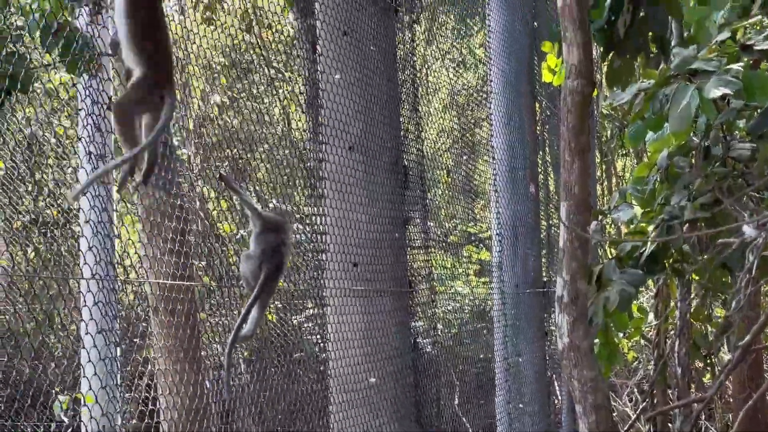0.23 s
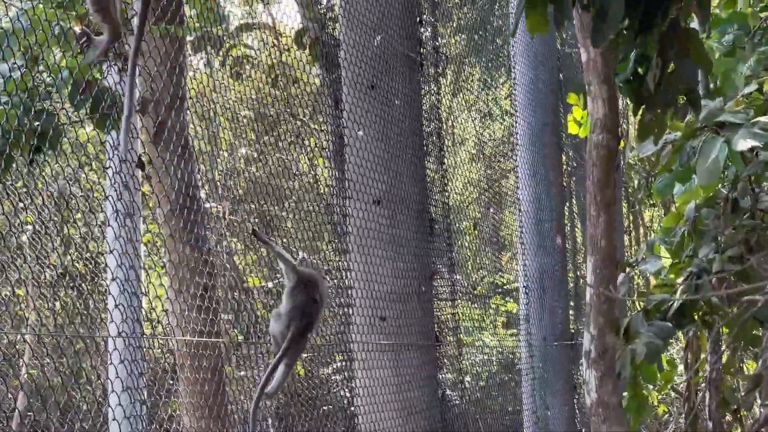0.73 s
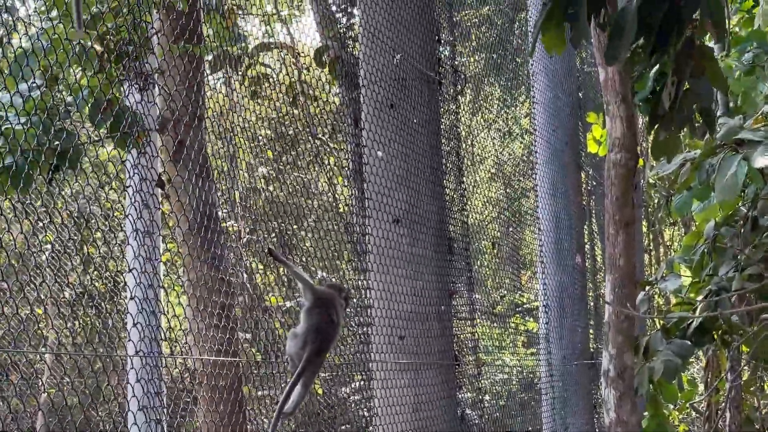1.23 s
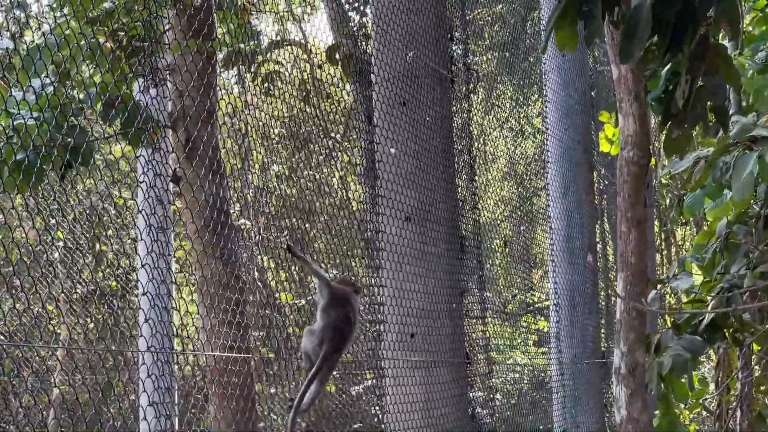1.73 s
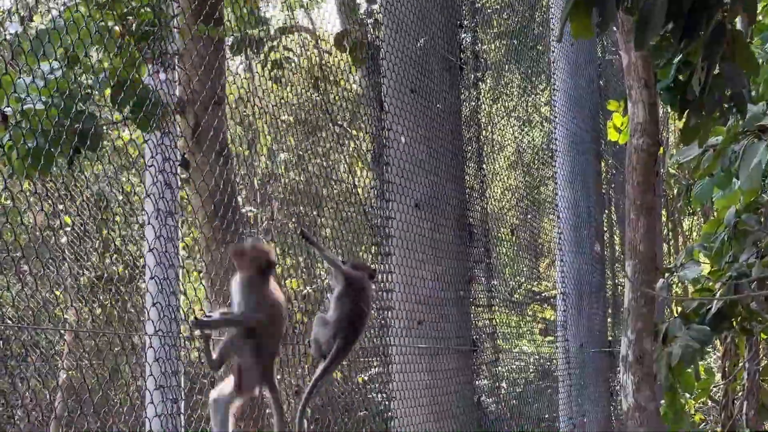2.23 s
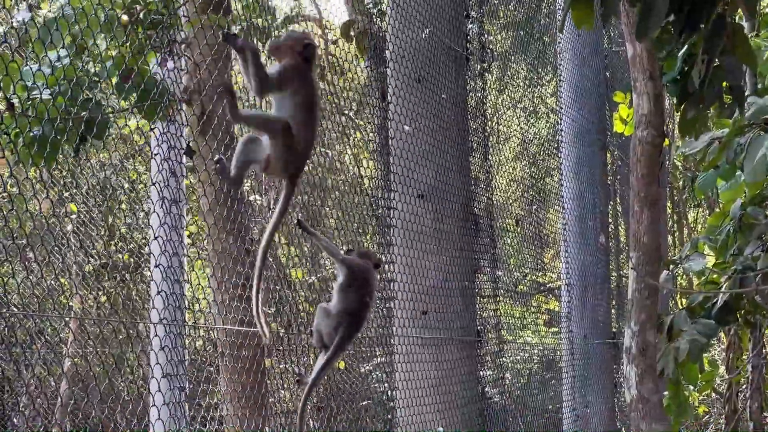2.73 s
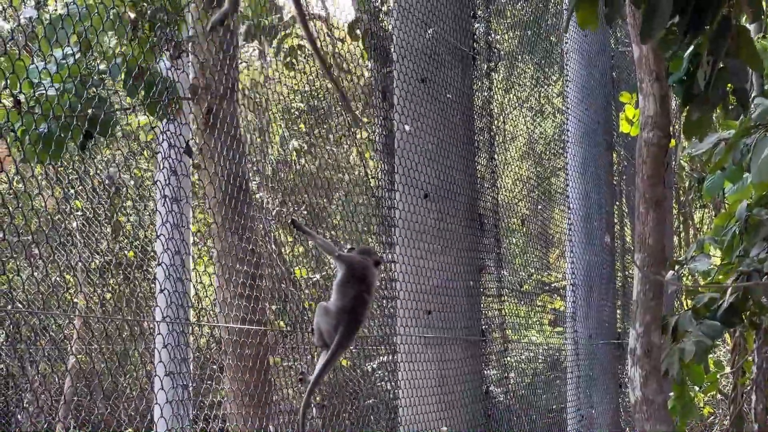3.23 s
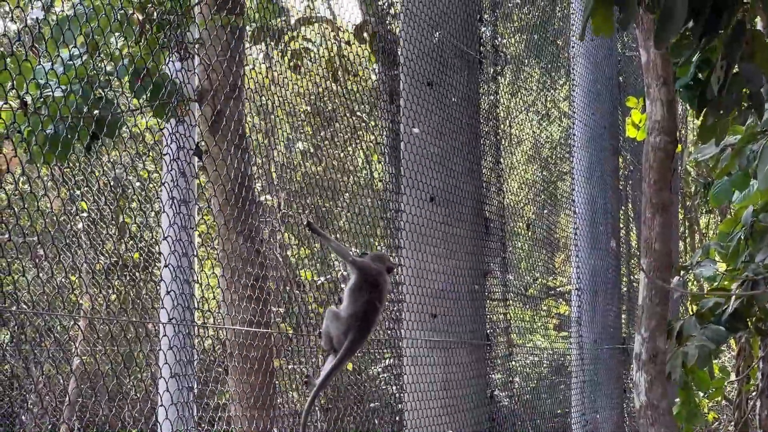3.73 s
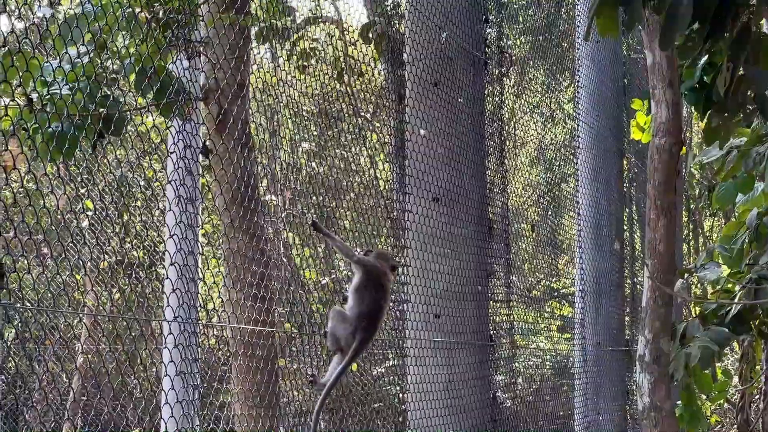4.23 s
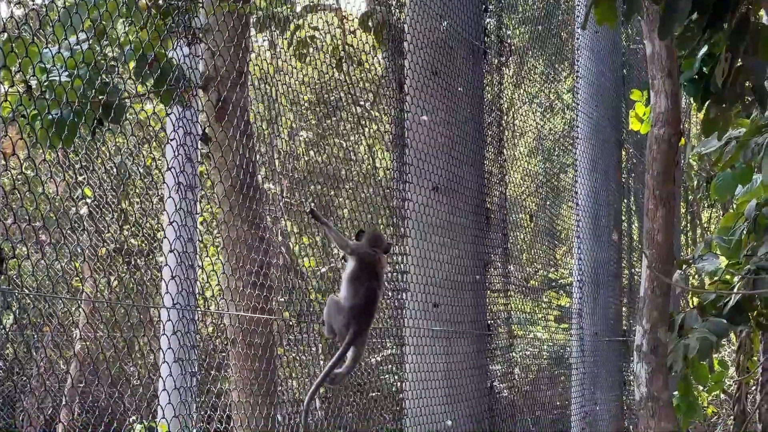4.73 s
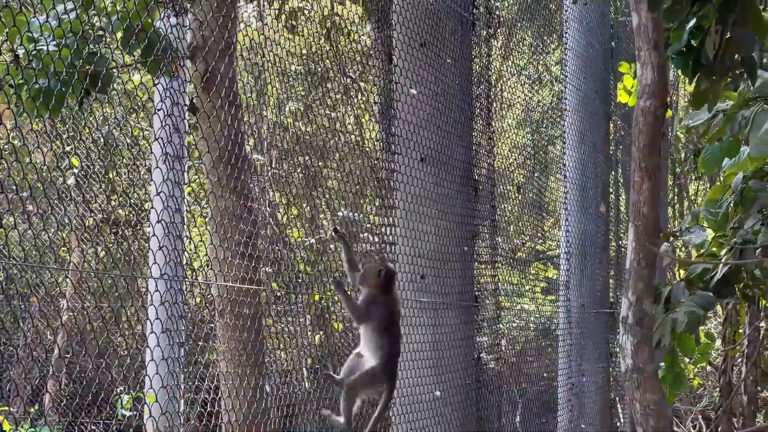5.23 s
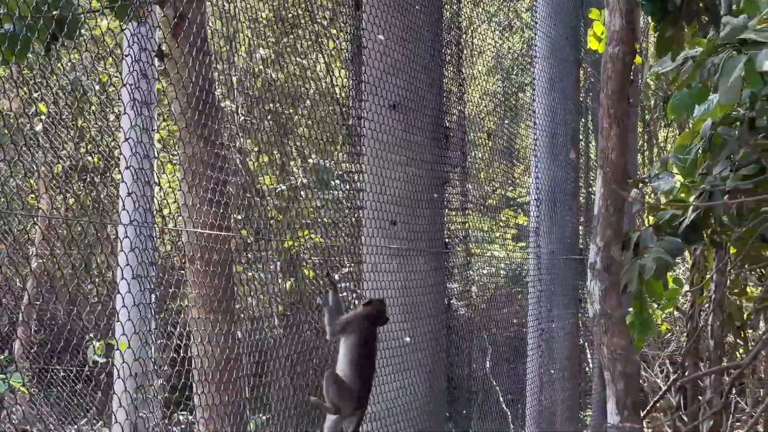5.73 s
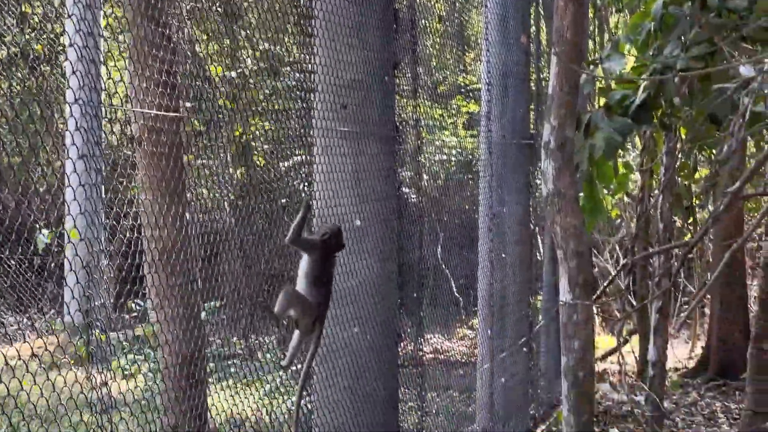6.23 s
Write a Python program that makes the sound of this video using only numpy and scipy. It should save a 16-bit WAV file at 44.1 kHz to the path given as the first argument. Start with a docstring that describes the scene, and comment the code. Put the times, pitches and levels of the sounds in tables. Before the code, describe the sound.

A low rumble with a faint hum of far engines runs under the nearby sounds of monkeys moving in a forest. Twigs crack at the start, followed by uneven rustling strokes, a few weak bird chirps and small pings of fence wire. Later the mesh thuds and rattles under hands and feet, and dry leaves crunch in bursts with more snaps. The trees add a light echo.

```python
"""Twigs snap and a fence wire pings over a low rumble and far engines: monkeys climb in a dry forest.
Soft rubbing and swishing comes and goes, the noise of sliding friction, with a few faint chirps early on.
Near the end hands and feet knock the mesh while dry leaves crunch in several pushes.
Pings, snaps and thuds are damped vibrations; the crunch is a swarm of tiny fractures.
The trunks scatter all these near sounds into echoes."""
import sys
import numpy as np
from scipy import signal
from scipy.fft import rfft, irfft
from scipy.io import wavfile
from scipy.ndimage import uniform_filter1d

SR = 44100
rng = np.random.default_rng(int(sys.argv[2]) if len(sys.argv) > 2 else 0)


def output_pcm(signal):
    """Save a mono or channel-first signal as 16-bit PCM at the path in sys.argv[1].

    Samples are clipped to [-1, 1] before scaling.
    """
    pcm = np.clip(np.atleast_2d(signal).T, -1, 1) * 32767
    wavfile.write(sys.argv[1], SR, np.round(pcm).astype(np.int16))


N = 285327
TIME, FREQS = np.arange(N) / SR, np.fft.rfftfreq(N, 1 / SR)

# Spectra of the noises. Each row: frequency in Hz, relative spectral density in dB.
RUMBLE_COLOUR = [(22, -53), (36, -6.5), (50, 3.5), (80, 3.5), (105, 2.5), (150, -0.5), (175, -6),
                 (205, -19.5), (250, -16.5), (340, -23), (480, -33), (900, -41)]
AIR_COLOUR = [(200, -4), (600, 4), (1100, 1), (2500, -1), (5000, 0.5), (9000, -0.5), (11800, -2.5)]
RUB_COLOUR = [(250, -21.5), (600, -8), (1000, -7), (1600, -1), (2500, 1.5), (3400, 2), (4300, 1.5),
              (6200, 1), (9000, -2), (11800, -5)]
FIZZ_COLOUR = [(4000, -32), (8000, -4), (11500, 3.5)]
RATTLE_COLOUR = [(200, -38), (500, -5), (1400, -5.5), (4000, -18)]
CRISP_COLOUR = [(500, -63), (1300, -12.5), (2400, -10), (4000, -11), (6000, -9.5), (8500, -7.5),
                (11900, -9)]
BODY_COLOUR = [(150, 3), (280, -2.5), (370, -3), (500, -5.5), (800, -8), (1300, -7), (2200, -27),
               (4000, -23)]
# Envelopes of three far engines and of the fizz in the rubbing. Each row: time in seconds, level in dB.
DRONE_LEVEL = [(0, -45), (1.7, -50), (2.08, -37.5), (2.45, -51), (3.1, -44), (3.9, -43), (4.7, -47.5),
               (6.47, -46.5)]
HUM_LEVEL = [(1.9, -57), (2.5, -52), (3.4, -51), (4.15, -45), (4.45, -68), (6.47, -53)]
REV_LEVEL = [(0, -68), (.95, -46), (1.35, -59), (1.75, -47.5), (2.2, -85)]
FIZZ_LEVEL = [(.1, -50), (.42, -94), (.7, -57.5), (1.05, -58), (1.2, -47.5), (1.85, -44.5), (2.1, -64.5)]
# A faint far whine. Each row: time in seconds, pitch in Hz, level in dB.
WHINE = [(1.7, 218, -67), (2.3, 221, -58.5), (3, 209.6, -69.5), (6.47, 213.3, -61.5)]
# A bird's whistle. One row: start and length in seconds, first and limiting pitch in Hz, level in dB.
WHISTLE = (.629, .031, 7600, 9650, -52)
# Raspy chirps and soft swishes. Each row: start and length in seconds, centre pitch in Hz,
# glide as a share of that pitch, starting bandwidth in Hz, relative level in dB.
CHIRPS = [(.238, 0.095, 3160, -0.024, 750, -46.5), (.888, 0.093, 3145, -0.068, 620, -48),
          (1.405, 0.067, 2850, 0.24, 1100, -44), (1.535, .19, 2654, -0.36, 1300, -45),
          (1.812, 0.13, 4460, 0.16, 1300, -45.5), (1.83, 0.077, 2924, 0.078, 604, -39.5),
          (1.944, 0.056, 3050, -0.21, 450, -46)]
SWISHES = [(1.046, 0.15, 2206, -.3, 704, -56.5), (1.4, 0.5, 5950, .06, 400, -55),
           (1.473, 0.24, 1404, -0.087, 437, -51), (1.67, 0.31, 1856, 0.2, 625, -47.5),
           (2.09, 0.13, 5830, -0.095, 1000, -47.5), (2.129, 0.34, 3020, -0.11, 920, -50.5),
           (2.3, 0.477, 1978, -0.0028, 800, -53.5), (2.47, 0.11, 5950, 0.083, 1300, -46.5),
           (2.74, 0.24, 5320, 0.021, 1200, -48.5), (2.87, 0.33, 4350, 0.072, 604, -50.5),
           (2.94, 0.13, 5930, 0.064, 1200, -45.5), (3.38, 0.26, 5790, 0.075, 1400, -46.5),
           (3.19, 0.33, 2303, -0.051, 477, -48.5), (3.485, 0.25, 2388, -0.22, 554, -44),
           (3.99, 0.15, 2028, -0.2, 654, -52.5), (4.279, 0.29, 2108, -0.22, 506, -53),
           (4.715, 0.31, 2270, -.16, 351, -52), (5.359, 0.17, 2134, -0.027, 300, -49),
           (5.815, .17, 2378, -0.25, 680, -44), (6.092, 0.19, 2300, -0.012, 480, -46.5)]
# Rubbing strokes. Each row: start and length in seconds, relative levels of grains and of hiss in dB.
STROKES = [(0.075, 0.021, -59, -66), (.222, 0.039, -64, -64.5), (0.822, 0.24, -72, -50.5),
           (1.106, 0.26, -64, -50.5), (1.328, .77, -59.5, -52), (2.082, 0.56, -58, -50),
           (2.64, 0.14, -58.5, -57), (2.752, 0.44, -57.5, -53), (3.187, 0.5, -57.5, -46.5),
           (3.786, 0.1, -57, -61), (3.953, 0.24, -63, -54), (4.274, 0.23, -60.5, -50.5)]
# Wire pings. Each row: start in seconds, pitch in Hz, spread of nearby modes to either side in Hz,
# decay time in seconds, level in dB.
PINGS = [(.12, 3000, 50, 0.025, -58), (2.315, 4090, 111, 0.028, -44.5), (2.318, 6130, 130, .016, -41),
         (3.6, 2265, 131.5, 0.11, -53)]
# Snapping twigs and wires. Each row: start in seconds, ring pitch in Hz, ring level in dB,
# crack pitch in Hz, crack level in dB.
SNAPS = [(0.1185, 1570, -38, 8400, -25), (0.1181, 2940, -26, 6640, -27), (0.2234, 3640, -25, 6630, -22),
         (4.494, 2140, -33.5, 5970, -55), (5.0052, 3220, -25, 6950, -20.5), (5.5116, 2000, -48, 7300, -25),
         (5.746, 3100, -32.5, 7100, -28.5), (6.06, 1980, -42.5, 8700, -28), (6.3105, 5700, -28, 6200, -31)]
# Blows on the mesh. Each row: start in seconds, thud pitch in Hz, levels of thud and of rattle in dB.
KNOCKS = [(4.494, 496, -54, -46), (4.782, 342, -43, -46.5), (4.838, 490, -43, -44),
          (4.928, 365, -44, -45.5), (4.967, 347, -42, -52), (5.005, 338, -47, -43.5),
          (5.745, 510, -54, -46.5), (6.063, 420, -38.5, -49)]
# Pushes through dry leaves. Each row: start in seconds, length in seconds, relative level in dB.
PUSHES = [(4.655, 0.054, -54), (4.712, 0.095, -47.5), (4.83, 0.18, -42), (5.03, 0.097, -46),
          (5.17, 0.09, -44), (5.32, 0.18, -47.5), (5.53, 0.31, -50.5), (5.85, 0.31, -59.5),
          (6.07, 0.17, -47), (6.18, 0.038, -48.5), (6.39, 0.24, -50)]
# Likeness of the noise at the two microphone ports. Each row: frequency in Hz, correlation from 0 to 1.
PORT_CORRELATION = [(60, 1), (150, 0.9), (400, 0.84), (1000, 0.48), (2200, 0.93), (12000, 1)]
# Phase between the ports. Each row: frequency in Hz, lead of the left port in radians.
PORT_PHASE = [(0, 0), (950, .3), (1800, -.3), (3250, .8), (5500, .05), (8750, .1), (9300, -1.6),
              (10250, -3.14), (11700, -6.1), (12750, -6.5), (13300, -9.4), (14400, -9.5), (14700, -12.5)]
# The microphone's treble roll-off. Each row: frequency in Hz, gain in dB.
TREBLE = [(11700, 0), (13000, -17), (13400, -42), (14800, -22)]


def gain_of(db):
    """Amplitude grows tenfold with every 20 dB."""
    return 10 ** (np.asarray(db) / 20)


def unit_rms(x):
    """Normalisation to a mean power of one."""
    return x / np.sqrt(np.mean(x ** 2) + 1e-20)


def spectrum(points):
    """Interpolation on a logarithmic frequency axis."""
    hz, value = np.transpose(points)
    return np.interp(np.log(FREQS + 1), np.log(hz + 1), value)


def follow(rows, column=1):
    """Linear interpolation of one column in time."""
    rows = np.asarray(rows)
    return np.interp(TIME, rows[:, 0], rows[:, column])


def add(mix, start, sound):
    """Superposition: a mono sound joins both channels at its start time."""
    part = mix[:, max(round(start * SR), 0):][:, :len(sound)]
    part += sound[:part.shape[1]]


def wander(hz):
    """Low-passed noise gives a random fluctuation of unit rms."""
    return unit_rms(irfft(rfft(rng.standard_normal(N)) / (1 + (FREQS / hz) ** 4), N))


def coloured(drive, colour):
    """Partial coherence: two independent signals are filtered, then mixed as sum and difference."""
    common, apart = rfft(drive) * gain_of(spectrum(colour))
    correlation = np.clip(spectrum(PORT_CORRELATION), 0, 1)
    common, apart = common * np.sqrt(1 + correlation), apart * np.sqrt(1 - correlation)
    return unit_rms(irfft(np.array([common + apart, common - apart]), N))


def crackle(per_s, spread_db, hiss, decay_s=0.0016):
    """Shot noise: tiny fractures of unequal size each release a decaying burst, over a smooth hiss."""
    sizes = gain_of(spread_db * np.minimum(rng.exponential(1, N), 3.3))
    impulses = sizes * (rng.random(N) < per_s / SR)
    bursts = unit_rms(signal.lfilter([1], [1, -np.exp(-1 / (decay_s * SR))], impulses))
    return unit_rms(rng.standard_normal((2, N)) * np.hypot(bursts, hiss))


def patchy(x, depth_db):
    """Different leaves resonate at different pitches, so the spectrum varies from moment to moment."""
    frames = signal.stft(x, nperseg=512, noverlap=384)[2]
    patches = uniform_filter1d(rng.standard_normal(frames.shape[1:]), size=7, axis=0)
    patches = unit_rms(uniform_filter1d(patches, size=14, axis=1))
    return unit_rms(signal.istft(frames * gain_of(depth_db * patches), nperseg=512, noverlap=384)[1][:, :N])


def efforts(rows, attack_s, release_s):
    """Incoherent sounds add in power; each effort rises, holds and dies away."""
    power = np.zeros(N)
    for start, length, db, *_ in rows:
        rise = np.clip((TIME - start) / attack_s, 0, 1)
        fall = np.exp(-np.maximum(TIME - start - length, 0) / release_s)
        power += (gain_of(db) * rise * fall) ** 2
    return np.sqrt(power)


def narrowband(noise, width_hz, skirt=2.4):
    """A resonance driven by noise fluctuates in amplitude and phase at a rate set by its bandwidth."""
    hz = np.fft.fftfreq(len(noise), 1 / SR)
    swing = np.fft.ifft(np.fft.fft(noise) / (1 + abs(2 * hz / width_hz) ** skirt))
    return swing / np.std(swing)


def glides(rows, skew, grain, narrowing):
    """Noise in a gliding resonance gives a fuzzy whistle; narrowing is its final share of bandwidth."""
    out = np.zeros((2, N))
    for start, length, pitch_hz, glide, width_hz, db in rows:
        progress = np.linspace(0, 1, min(int(length * SR), SR))
        noise = rng.standard_normal((3, SR))
        drive = noise[0] + 1j * noise[1]
        broad, narrow = (narrowband(drive, w)[:len(progress)] for w in (width_hz, width_hz * narrowing))
        band = (1 - progress) * broad + progress * narrow
        hz = pitch_hz * (1 + glide * (progress - .5))
        carrier = np.exp(2j * np.pi * np.cumsum(hz) / SR)
        flicker = 1 + grain * unit_rms(uniform_filter1d(noise[2], size=120))[:len(progress)]
        swell = np.sin(np.pi * progress ** skew).clip(0) ** 0.5
        add(out, start, gain_of(db) * swell * unit_rms((band * flicker * carrier).real))
    return out


def forest_echoes(x, t60_s):
    """Scattering from trunks returns sparse echoes that decay exponentially."""
    t = np.arange(SR // 2) / SR
    taps = rng.standard_normal((2, len(t))) * (rng.random((2, len(t))) < .05)
    taps *= (t > .005) * gain_of(-60 * t / t60_s)
    taps = taps + 0.64 * taps[::-1]  # each side shares the other's echoes
    return signal.fftconvolve(x, taps / np.linalg.norm(taps[0]), axes=1)[:, :N]


def ground_bounce(x, delay_s, bounce_db):
    """Interference with one early reflection acts as a comb filter."""
    bounce = gain_of(bounce_db)
    comb = 1 + bounce * np.exp(-2j * np.pi * FREQS * delay_s)
    return irfft(rfft(x) * comb, N) / np.hypot(1, bounce)


def background():
    """Filtered random noise makes a low, wavering rumble and the hiss of still air."""
    swell = gain_of(.8 * wander(3))
    rumble = gain_of(-43) * swell * coloured(rng.standard_normal((2, N)), RUMBLE_COLOUR)
    air = gain_of(-57) * coloured(rng.standard_normal((2, N)), AIR_COLOUR)
    return rumble + air


def engine(hz, db):
    """The long path through the trees modulates an engine tone in frequency and amplitude."""
    cycles = np.cumsum(hz + 1.493 * wander(5.06)) / SR
    return np.sqrt(2) * np.sin(2 * np.pi * cycles) * (1 + 0.048 * wander(2.5)) * gain_of(db)


def engines(drone_hz=74.4, hum_hz=127.2, rev_top_s=0.549, rev_period_s=.6):
    """Four far tones superpose: a drone, a hum, one that revs early on and a faint whine."""
    rev_hz = 156.5 + 7.1 * np.cos(2 * np.pi * (TIME - rev_top_s) / rev_period_s)
    steady = engine(drone_hz, follow(DRONE_LEVEL)) + engine(hum_hz, follow(HUM_LEVEL))
    return steady + engine(rev_hz, follow(REV_LEVEL)) + engine(follow(WHINE), follow(WHINE, column=2))


def chirping(rise_s=.011):
    """Narrowband noise makes raspy chirps; a bird's whistle is a pure tone that rises and levels off."""
    chirps = gain_of(-5.5) * glides(CHIRPS, skew=0.65, grain=0.3, narrowing=.9)
    start, length, first_hz, top_hz, db = WHISTLE
    t = np.arange(0, length, 1 / SR)
    hz = top_hz + (first_hz - top_hz) * np.exp(-t / rise_s)
    swell = gain_of(db) * np.sin(np.pi * t / length)
    add(chirps, start, swell * np.sin(2 * np.pi * np.cumsum(hz) / SR))
    return chirps


def swishing(hiss_hz=5805, hiss_glide=.06, hiss_width_hz=2650):
    """Noise excites resonances: swishes narrow as they die, and each stroke has a slightly rising hiss."""
    hisses = [(start, length, hiss_hz, hiss_glide, hiss_width_hz, db) for start, length, _, db in STROKES]
    swishes = gain_of(-3.5) * glides(SWISHES, skew=0.51, grain=0.16, narrowing=.58)
    return swishes + gain_of(-4) * glides(hisses, skew=0.67, grain=0.26, narrowing=1)


def rubbing():
    """Sliding friction sheds dense fine grains stroke by stroke, with a dry fizz early on."""
    grains = patchy(coloured(crackle(per_s=3500, spread_db=2.2, hiss=2.2), RUB_COLOUR), depth_db=1.5)
    level = efforts(STROKES, attack_s=0.021, release_s=0.076) * gain_of(10 + 1.8 * wander(3.9))
    fizz = coloured(crackle(per_s=2500, spread_db=1.4, hiss=0.41), FIZZ_COLOUR)
    return grains * level + fizz * gain_of(follow(FIZZ_LEVEL))


def wire_pings(nearby_modes=5, attack_s=0.0094):
    """A wire rings in damped modes whose close frequencies beat against each other."""
    out, t = np.zeros((2, N)), np.arange(SR * 3 // 4) / SR
    for start, pitch_hz, spread_hz, decay_s, db in PINGS:
        offsets, phases = rng.uniform(-1, 1, (2, nearby_modes, 1))
        neighbours = np.sin(2 * np.pi * (pitch_hz + spread_hz * offsets) * t + np.pi * phases).sum(0)
        ring = unit_rms(np.sin(2 * np.pi * pitch_hz * t) + 1.2 * neighbours)
        envelope = np.minimum(t / attack_s, 1) * np.exp(-t / decay_s)
        add(out, start, gain_of(db) * envelope * ring)
    return out


def snaps(swell_cycles=1.03, splinter_s=0.0026, splinter_db=-8):
    """A break excites two heavily damped modes, a ring and a treble crack, and sprays splinters."""
    out, t = np.zeros((2, N)), np.arange(1024) / SR
    for start, ring_hz, ring_db, crack_hz, crack_db in SNAPS:
        splinters = np.gradient(rng.standard_normal(len(t))) * np.exp(-t / splinter_s)
        snap = gain_of((ring_db + crack_db) / 2 + splinter_db) * splinters
        for hz, db in ((ring_hz, ring_db), (crack_hz, crack_db)):
            age = hz * t / swell_cycles
            snap += gain_of(db) * np.sin(2 * np.pi * hz * t) * age * np.exp(1 - age)
        add(out, start, snap)
    return out


def knocks(attack_s=0.0018, thud_s=0.0082, rattle_s=0.022):
    """The impact of a hand or foot excites a damped thud in the fence and rattles its loose mesh."""
    thuds, shaking, t = np.zeros((2, N)), np.zeros((2, N)), np.arange(SR // 10) / SR
    attack = np.minimum(t / attack_s, 1)
    for start, pitch_hz, thud_db, rattle_db in KNOCKS:
        thud = np.sin(2 * np.pi * pitch_hz * t) * np.exp(-t / thud_s)
        add(thuds, start, gain_of(thud_db) * attack * thud)
        add(shaking, start, gain_of(rattle_db) * attack * np.exp(-t / rattle_s))
    return thuds + shaking * coloured(rng.standard_normal((2, N)), RATTLE_COLOUR)


def leaf_ticks(per_s=150, spread_db=3.5):
    """Sparse random impulses are heard singly, as sharp fractures that stand out of the crunch."""
    sizes = gain_of(spread_db * np.minimum(rng.exponential(1, N), 2))
    impulses = sizes * (rng.random(N) < per_s / SR) * rng.choice([-1, 1], (2, N))
    return patchy(coloured(impulses, CRISP_COLOUR), depth_db=2)


def leaf_crunch():
    """Brittle fracture: dry leaves break in clumps at each push, crisp above a duller body."""
    clumps = gain_of(1.2 * wander(70))
    level = efforts(PUSHES, attack_s=0.011, release_s=0.056) * clumps
    fractures = crackle(per_s=1900, spread_db=3.7, hiss=.6)
    thuds = crackle(per_s=600, spread_db=3.2, hiss=.8)
    crisp = patchy(coloured(fractures, CRISP_COLOUR), depth_db=1.5) + .6 * leaf_ticks()
    body = patchy(coloured(thuds, BODY_COLOUR), depth_db=1.6)
    return level * (gain_of(4.5) * crisp + gain_of(-6.5) * body)


def scene():
    """The direct sound of the near sources and their echoes superpose on the far rumble."""
    swishes = swishing()
    chirps = chirping()
    pings = wire_pings()
    hits = snaps() + knocks()
    leaves = ground_bounce(rubbing() + leaf_crunch(), delay_s=.0054, bounce_db=-16.5)
    scattered = gain_of(-3) * (swishes + chirps) + gain_of(-6.5) * (hits + pings + leaves)
    echoes = forest_echoes(scattered, t60_s=1.0)
    far = (background() + engines()) * gain_of([[-.6], [.6]])  # a little stronger on the right
    return far + leaves + swishes + chirps + pings + hits + echoes


def record(dry, edge_hz=15800):
    """The microphone is a linear filter: dulled treble, a phase shift between ports and a band limit."""
    left, right = rfft(dry) * gain_of(spectrum(TREBLE))
    lag = np.interp(FREQS, *np.transpose(PORT_PHASE))
    ports = irfft(np.array([left, right * np.exp(-1j * lag)]), N)
    lowpass = signal.firwin(511, edge_hz, window=("kaiser", 9), fs=SR)
    return signal.oaconvolve(ports, lowpass[None], "same")


dry = scene()
out = record(dry)
output_pcm(out)
```